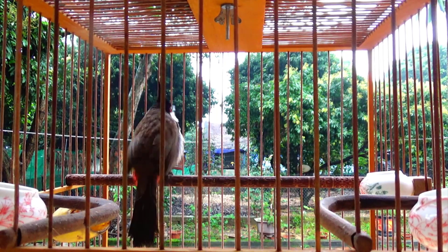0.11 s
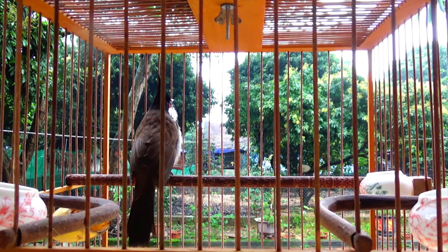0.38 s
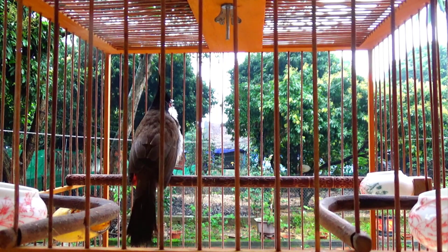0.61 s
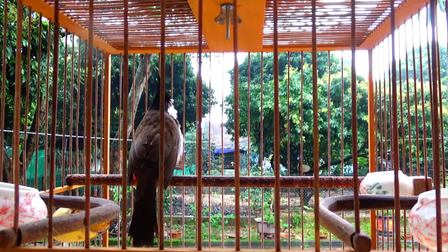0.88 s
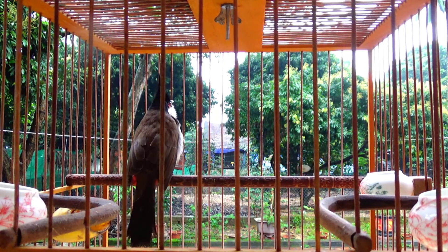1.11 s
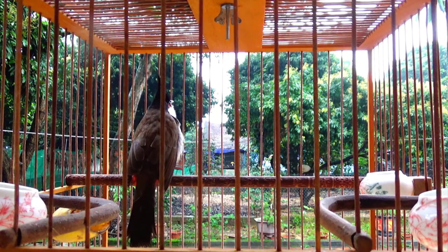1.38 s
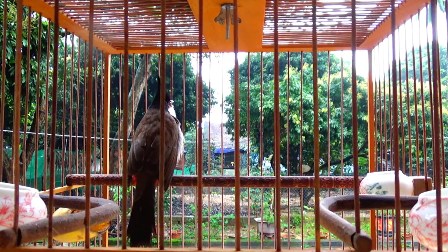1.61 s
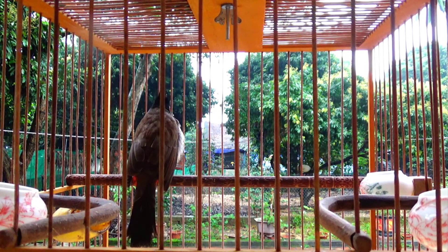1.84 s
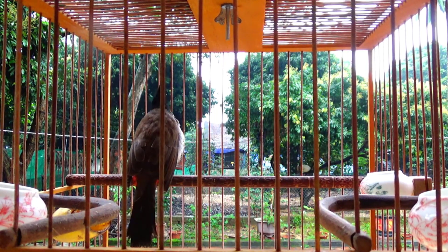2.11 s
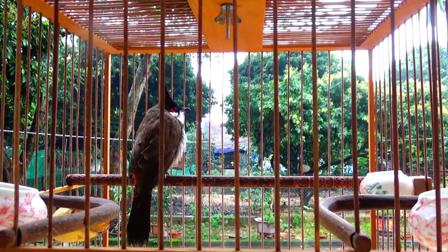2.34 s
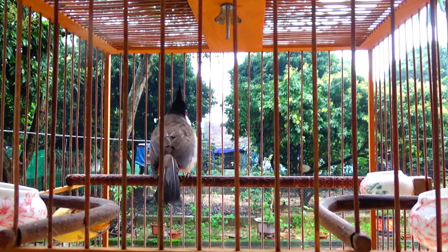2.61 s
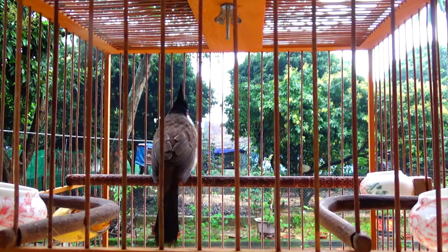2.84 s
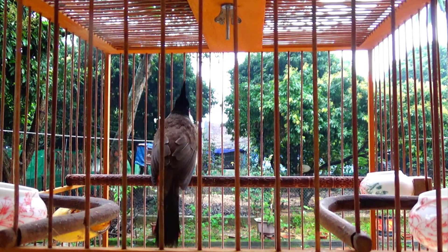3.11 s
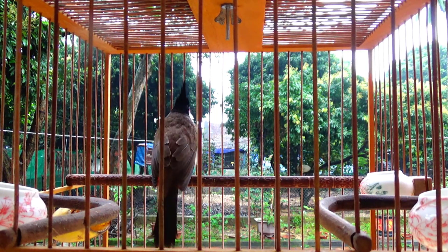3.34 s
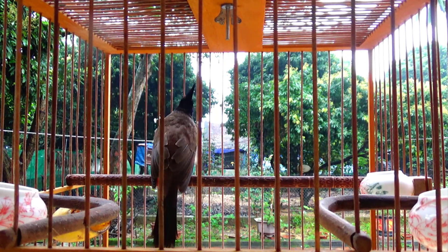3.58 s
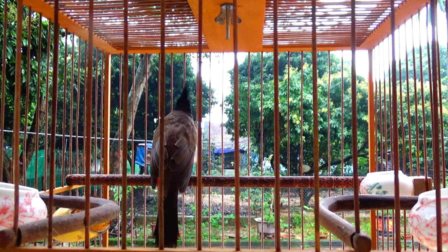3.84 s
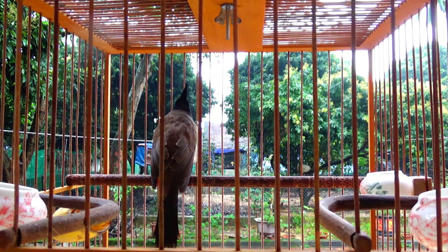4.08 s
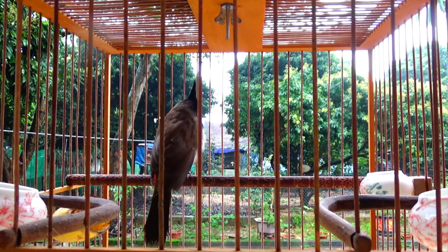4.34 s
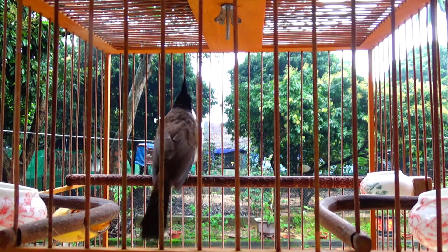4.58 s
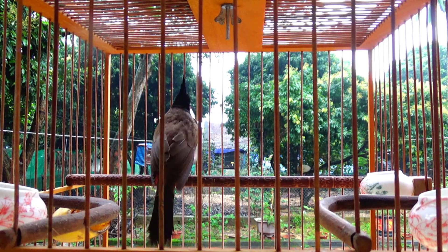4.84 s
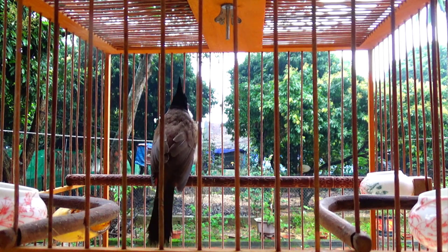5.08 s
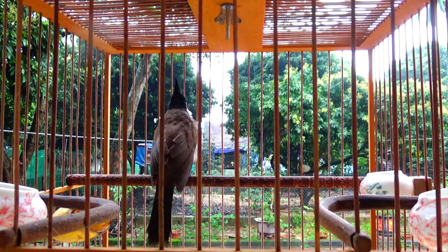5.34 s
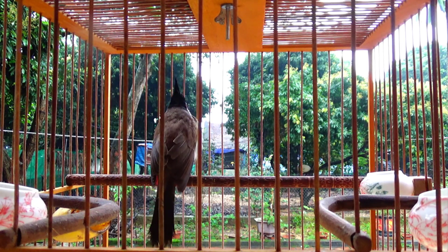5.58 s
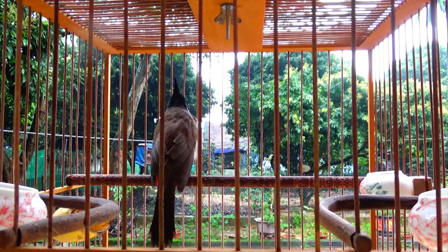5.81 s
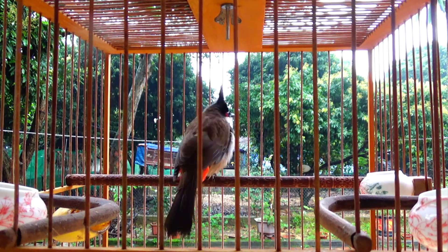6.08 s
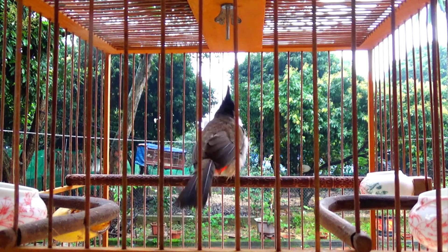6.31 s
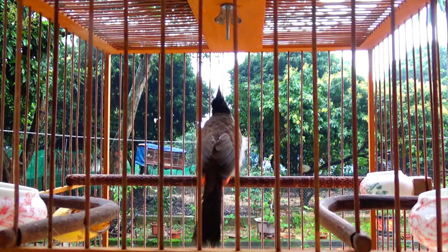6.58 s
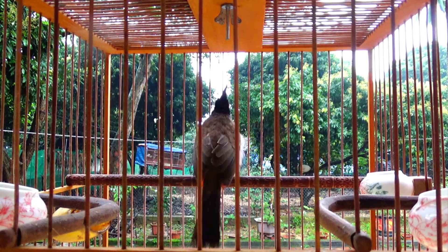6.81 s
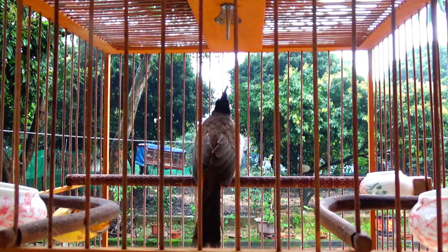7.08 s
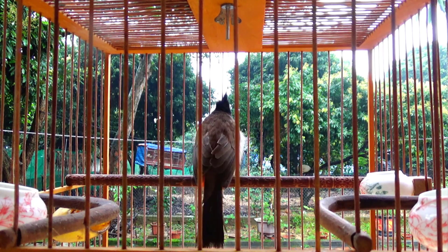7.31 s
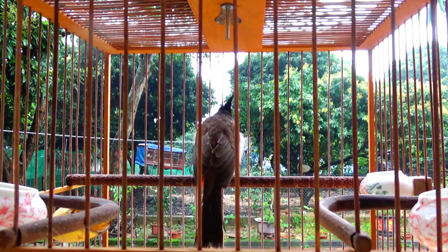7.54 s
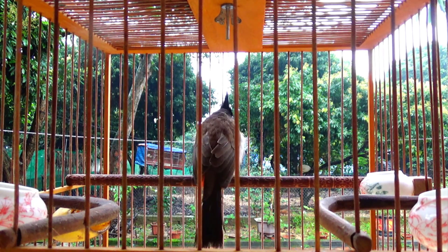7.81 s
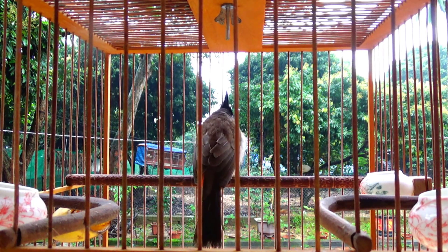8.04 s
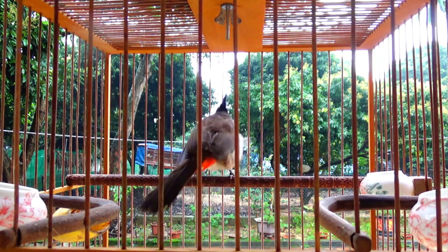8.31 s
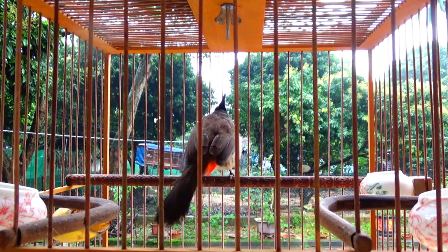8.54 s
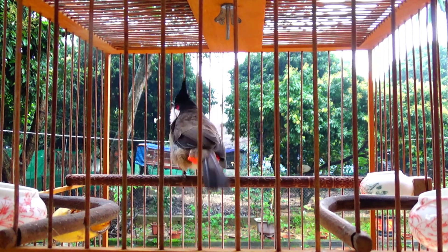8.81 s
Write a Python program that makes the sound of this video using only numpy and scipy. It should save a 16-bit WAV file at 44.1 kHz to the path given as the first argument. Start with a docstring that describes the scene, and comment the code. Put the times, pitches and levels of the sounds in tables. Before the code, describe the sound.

Outdoors among trees, a small caged songbird sings very close to the microphone. At 0 s the faint echo of earlier song dies away. At 0.2 s comes a quick climbing trill of tiny pulses, then four short, bright warbled whistles from 0.4 to 1.1 s: one leaping upward, one high, one mid-pitched and wavering, and a softer low one that curls up and falls. Nearly the same phrase returns at 2.65-3.6, 4.6-5.45 and 6.25-7.15 s. A lone trill sounds at 8.75 s. Scattered tree echoes trail each phrase. Between them lie soft low traffic rumble, faint drone swells, airy hiss with thin insect tones, and weak distant bird calls and whistles. Abrupt joins near 2.3, 4.3, 5.9 and 8.4 s cut echoes and shift the background, with leftover song tails after some. Loud notes briefly duck the background; the image is nearly mono.

```python
"""The echo tail of an earlier song rings first; then a songbird close to the microphone sings a pulsed trill
and four warbled whistles. The phrase returns three times, and a last trill stands alone; pitched sines with
throat overtones make it. Throughout, filtered noise gives tree echoes, distant birds, traffic rumble and insect
hiss. Four splices cut off the echoes and reset the background; a fast limiter holds the peaks and ducks the rest."""
import sys
import numpy as np
from scipy import signal
from scipy.fft import rfft, irfft
from scipy.io import wavfile
from scipy.ndimage import uniform_filter1d, minimum_filter1d

SR = 44100
rng = np.random.default_rng(int(sys.argv[2]) if len(sys.argv) > 2 else 0)


def store_pcm(level_fs):
    """Save levels as 16-bit WAV."""
    pcm = np.round(np.clip(level_fs, -1, 1) * 32767).astype(np.int16)
    wavfile.write(sys.argv[1], SR, np.atleast_2d(pcm).T)


def elevation(decibels):
    """Turn decibel levels (scalar or array-like) into linear amplitude ratios."""
    levels = np.asarray(decibels, float)
    return 10 ** (levels / 20)


N = 393372

# Four whistle shapes before transposing: from_start_s, pitch_hz, relative level_db
SYLLABLES = [
    [(.002, 1419, -26), (.006, 1615, -23), (.011, 2122, -7), (.014, 2110, -15), (.068, 1980, -7.5),
     (.071, 2399, -1), (.0815, 2317, -1), (.095, 2524, -10), (.1015, 2588, -26.5)],
    [(.001, 1358, -36.5), (.0065, 1712, -20.5), (.011, 1788, -14), (.021, 1833, -14.5), (.031, 2330, -4),
     (.0355, 3161, -6), (.0485, 3263, -8), (.064, 3218, -3.5), (.07, 3256, -19), (.085, 3206, -17.5),
     (.105, 3204, -27.5), (.122, 3253, -39.5)],
    [(0, 2490, -32), (.004, 2335, -10), (.01, 2194, -8), (.025, 2290, -14.5), (.029, 2536, -2),
     (.049, 2631, -9.5), (.054, 2457, -8.5), (.0935, 2377, -3), (.0965, 2440, -28), (.1015, 2352, -31)],
    [(0, 1377, -42), (.0065, 1463, -18), (.016, 1537, -20), (.018, 1746, -6.5), (.045, 1764, -8),
     (.05, 1506, -12.5), (.064, 1526, -15.5), (.0745, 1842, -2), (.088, 2005, -11), (.109, 1772, -11),
     (.128, 1623, -16.5), (.16, 1497, -19.5), (.1675, 1580, -42)],
]
# Where each shape turns from its first part to its second: from_start_s
TURN_S = [.072, .030, .054, .086]
# Sung whistles, the four shapes in turn: start_s, turn_s, end_s, pitch_factor, relative level_db
NOTES = [(0.409, 0.483, 0.5164, 1.064, 0), (0.606, 0.637, 0.7275, 1.018, -1),
         (0.737, 0.793, 0.8405, 1.015, -0.5), (0.964, 1.049, 1.1355, 1.02, -5),
         (2.897, 2.969, 2.9985, 1.06, -1.5), (3.086, 3.116, 3.2075, 1, 0.5),
         (3.212, 3.266, 3.3135, 1.011, -0.5), (3.414, 3.5, 3.5815, 1.017, -4.5),
         (4.748, 4.822, 4.8515, 1.037, -2), (4.939, 4.968, 5.0605, 1.01, 1.1),
         (5.067, 5.122, 5.1675, 1.009, -1.8), (5.281, 5.365, 5.4525, 1.016, -4),
         (6.467, 6.539, 6.5675, 1.027, -0.8), (6.658, 6.687, 6.7785, 1.004, 0.4),
         (6.785, 6.837, 6.8845, 1.016, 3), (6.985, 7.07, 7.1585, 1.016, -5)]
# Upward flicks of pitch per shape, before transposing: from_start_s, height_hz, half_width_s
FLICKS = [
    [(.0735, 366.3, 0.0016), (.0848, 600, 0.0031), (.0965, 361.7, 0.0025)],
    [(0.0275, 768, .0022)],
    [(.021, 250, .003), (.057, 576, 0.003), (.0668, 635, 0.0042)],
    [(.0185, 600, 0.0015), (.0695, 400, .002), (.0795, 253, 0.002), (.0885, 398.5, .0025), (.1, 747, .004)],
]
# Brief dips in the tone per shape, before scatter: from_start_s, depth_db (negative lifts)
BREAKS = [
    [(.07, 18), (.086, 10), (.0955, 7.5)],
    [(.0145, -1), (.023, 18.5), (.0275, 9.5), (.0315, 20.5)],
    [(.007, 16), (.012, 16), (.0265, 11.5), (.054, 14)],
    [(.0205, 5), (.049, 8.5), (.063, 4), (.069, 5), (.077, 8.5), (.084, 12.5), (.092, 14.5), (.0945, 13),
     (.105, 5)],
]
BREAK_S, BREAK_SCATTER_S, BREAK_SCATTER = 0.0013, 0.0006, 0.35  # half width, time spread, log depth spread
FADE_S = 0.002  # fade at both ends of a whistle, in shape time

# Trills: first_pulse_s, last_pulse_s, pulses, soft_pulses at the start, first_pitch_hz (before scatter)
TRILLS = [(.2192, .269, 7, 0, 2170), (2.647, 2.6838, 6, 3, 1900), (4.5817, 4.6397, 8, 2, 1975),
          (6.24, 6.2996, 8, 1, 2060), (8.726, 8.7823, 8, 2, 1750)]
LAST_GAP_S = 0.0103  # gaps between pulses change evenly to this
TRILL_TOP_HZ, TRILL_CLIMB_S, LAST_PULSE_SAG_HZ = 2620, 0.011, 90.5
TRILL_TOP_DB, SOFT_START_DB, SOFTEST_DB = -2.5, -7, -12
TRILL_SCATTER_S, TRILL_SCATTER_HZ, TRILL_SCATTER_DB = 0.0004, 63, 1.2
PULSE_RISE_S, PULSE_FALL_S = 0.001, 0.0018
PULSE_DROP_HZ, PULSE_DROP_S = 260, 0.002
SCOOP_HZ, SCOOP_S, SCOOP_DB = 1195, 0.011, -8  # lead-in; dB re first pulse

# Overtone strength through throat and beak: frequency_hz, level_db re fundamental
THROAT = [(2200, -15.5), (3550, -16.5), (4000, -25), (4700, -33), (6500, -22), (8000, -28.5),
          (10000, -31.5), (12500, -35), (15500, -40.5)]
# Voice per shape, trill last: overtones_db, low_note_ring_hz, ring_width_hz, ring_lift_db, buzz_db
VOICING = [(1, 14000, 1400, 9, -35.5), (-3, 11000, 1200, 15.5, -37.5), (-6.5, 12000, 1200, 5, -43),
           (-10.5, 12100, 1400, 20, -28), (-3.5, 7000, 1700, 1.5, -32)]
# Per shape, trill last: partial_1.5_db, partial_2_db (both re throat), octave_share of unevenness
LOW_PARTIALS = [(4.5, 13.5, 0.51), (4, 7.5, 0.55), (-9.5, -6, 0), (3.5, -0.5, 0.25), (-4, -3, 0)]
# Uneven cycles add half-pitch partials, per shape: from_s, to_s, level_db re overtones
HALVES = [(0.057, 0.067, -2.5), (0.015, 0.032, 3.5), (0.0035, 0.069, -3.5), (0.045, 0.21, 1.5)]
EVEN_DB = -20  # those partials elsewhere in a whistle
# The beak turns toward the microphone, per phrase: treble_db at FACING_HZ
FACING_DB = [1.5, 1.5, 2.3, 3.4, 0.23]
FACING_HZ, FACING_POWER = 10000, 3.3  # higher treble changes more
# Gape of the beak moves the lowest throat resonance, per phrase: frequency_factor
GAPE = [1.05, .97, .87, .97, 1.01]
HIGH_NOTE_RING_HZ = 9880  # throat resonance on high notes
# Overtones above TOP_HZ are stronger on low notes and weaker on high ones
TOP_HZ, TOP_SWING_DB, LOW_NOTE_HZ, LOW_NOTE_SPAN_HZ = 11500, 4, 2330, 115
GLIDE_DULL_HZ_PER_S, EFFORT_POWER = 45000, 0.35  # overtones halve at this glide rate
RASP_DB, RASP_WIDTH_HZ = -19, 500
SINGER_DB = 2

# Joins between stretches of time: at_s
SPLICES_S = [2.335, 4.27, 5.915, 8.37]
ECHO_DB, ECHO_T60_S, ECHO_CLUMP_DB = -17, 0.3, 3
LONG_ECHO_DB, LONG_ECHO_T60_S = -19, 0.65  # re quick part
BRIGHT_ECHO_DB, BRIGHT_ECHO_T60_S = 7.5, 0.18
ECHO_ONSET_S, ECHO_SIDE = 0.02, 0.2

# Echo tails of earlier song at the start and after splices, and blurred distant calls:
# start_s, length_s, start_hz, end_hz, width_hz, level_db
TAILS_AND_CALLS = [ (0., 0.0097, 3220, 3125, 200, -27.5), (0.01, .2, 2926, 2935, 258, -34),
                   (0.016, 0.27, 2422, 2330, 247, -30), (0.071, .12, 6420, 5290, 900, -49),
                   (0.105, 0.13, 5100, 4675, 250, -43), (1.272, 0.12, 3190, 3430, 600, -55.5),
                   (1.37, 0.14, 3764, 3890, 700, -52), (1.522, 0.14, 5684, 5670, 153, -53),
                   (1.537, .08, 4720, 4180, 1470, -49), (2.337, .07, 3070, 3183, 326, -33),
                   (2.394, 0.43, 2910, 2898, 310, -28), (2.336, 0.65, 2366, 2400, 224, -28),
                   (2.686, .07, 3540, 3012, 500, -30), (4.284, 0.3, 2215, 2225, 200, -39.5),
                   (4.29, 0.25, 1846, 1890, 100, -39), (4.401, 0.19, 2485, 3133, 750, -42),
                   (5.916, 0.17, 2180, 2130, 170, -36.5), (5.917, 0.058, 1750, 1660, 153, -45.5),
                   (6.123, 0.19, 6330, 6143, 300, -41.5), (6.151, .08, 2125, 3130, 500, -44.5),
                   (7.455, .12, 6350, 6250, 400, -44.5), (7.504, 0.52, 2820, 2820, 302, -51.5),
                   (7.724, 0.17, 2305, 2150, 220, -41.5), (7.929, 0.32, 2742, 2747, 430, -35.5),
                   (8.039, 0.078, 2300, 2300, 150, -45), (8.116, 0.073, 1690, 1985, 250, -44.5),
                   (8.198, 0.177, 1820, 1900, 350, -46), (8.264, 0.095, 2590, 2456, 150, -35.5),
                   (8.578, 0.084, 5950, 5900, 288, -46.5), (8.607, .1, 4414, 4034, 700, -47)]
# Distant held whistles: start_s, length_s, pitch_hz, level_db
FAR_WHISTLES = [(2.789, 0.066, 850, -51), (3.625, .06, 4710, -62), (3.72, 0.069, 4700, -74),
                (3.861, 0.096, 5240, -56), (4.015, 0.057, 5240, -64), (4.17, .11, 4570, -56),
                (6.39, 0.075, 1033, -49), (7.996, 0.29, 1030, -56.5), (8.377, 0.21, 1320, -57)]
WHISTLE_WIDTH_HZ = 30
FAR_T60_S, FAR_ATTACK_S, FAR_RELEASE_T60_S = 1, 0.01, 0.2

# Background of each stretch: rumble_db, rumble_sink_db, hiss_db, hiss_sink_db, hum_db
STRETCHES = [(-47, 10, -49.5, 4.5, -62), (-48, 8.5, -47, 8.5, -65), (-44.5, 13, -46, 6.5, -69.5),
             (-48, 5.5, -45, 6.5, -67), (-45.5, -3, -52, 1, -75)]
RUMBLE_SINK_S, HISS_SINK_S, SINK_POWER = 0.65, 0.37, 5
# Traffic spectrum: frequency_hz, relative density_db per Hz
RUMBLE = [(15, -48), (36, -12), (113, -3), (146, -0.5), (232, -2), (493, -10), (585, -13), (782, -12),
          (1500, -24.5), (1950, -38.5), (3300, -120)]
# One swell of the traffic: centre_s, height_db, half_width_s
RUMBLE_SWELL = (7.65, 4.5, .16)
HUM_HZ, HUM_WIDTH_HZ = 600, 81
# Swells of the low drone: centre_s, peak_db, half_width_s
DRONE_SWELLS = [(0.201, -41, 0.033), (.92, -53, 0.048), (4.4, -47.5, 0.12), (5.32, -59.5, 0.13),
                (7.63, -48, 0.1)]
DRONE_HZ, DRONE_WIDTH_HZ = 154, 31
# Hiss spectrum: frequency_hz, relative density_db per Hz
HISS = [(590, -16), (1000, -3.5), (1630, -1.5), (2410, 0), (4210, -4.5), (5070, -7.5), (6550, -2),
        (8650, -9.5), (14900, -16.5), (16000, -25)]
# Insect bands: centre_hz, width_hz, level_db re hiss
INSECTS = [(7880, 50, -15), (9200, 50, -18), (10100, 50, -18.5)]
TREBLE_HZ, TREBLE_SINK = 3300, 0.32  # hiss treble follows the level by this extra share
SIDE_DB = -18.5  # stereo side of rumble and hiss, re mid
LIMIT_DB, RELEASE_DB_PER_S = -2.8, 170


def syrinx(pitch_hz, effort, half_db, shape, facing_db=0, gape=1):
    """A near sine; overtones grow with effort, weaken in fast glides and ring in the throat, where air buzzes."""
    size = len(pitch_hz)
    bright_db, ring_hz, width_hz, lift_db, buzz_db = VOICING[shape]
    low_15_db, low_2_db, octave_share = LOW_PARTIALS[shape]
    half_turn = np.pi * np.cumsum(pitch_hz * (1 + 0.0065 * wobble(size, 130))) / SR
    lowness = np.tanh((LOW_NOTE_HZ - pitch_hz) / LOW_NOTE_SPAN_HZ)  # 1 on low notes, -1 on high ones
    ring_hz = HIGH_NOTE_RING_HZ + (ring_hz - HIGH_NOTE_RING_HZ) * (1 + lowness) / 2
    overtones = np.zeros(size)
    for k in range(3, 22):  # partials in steps of half the pitch
        hz = k * pitch_hz / 2
        if k < 5:
            db = at_hz(THROAT, np.where(hz < 5000, hz / gape, hz)) + (low_15_db if k == 3 else low_2_db)
        else:
            db = at_hz(THROAT, hz) + bright_db
            db += facing_db * (np.minimum(hz, 16000) / FACING_HZ) ** FACING_POWER
            db += lift_db * np.exp(-((hz - ring_hz) / width_hz) ** 2)
            db += TOP_SWING_DB * lowness / (1 + np.exp((TOP_HZ - hz) / 400))
        db = db + half_db * (octave_share if k == 4 else k % 2)
        partial = np.sin(k * half_turn + k * k)
        overtones += elevation(db + 3.9 * wobble(size, 120)) * (hz < 16000) * partial
    glide = uniform_filter1d(np.abs(np.gradient(pitch_hz)), size=80) * SR
    steady = 1 / (1 + glide / GLIDE_DULL_HZ_PER_S)
    buzz = elevation(buzz_db + facing_db) * narrow(ring_hz, 2 * width_hz)
    rasp = elevation(RASP_DB) * (1.05 - steady) * narrow(pitch_hz, RASP_WIDTH_HZ)  # roughens fast glides
    brightness = (effort / effort.max()) ** EFFORT_POWER
    return effort * (np.sin(2 * half_turn) + rasp + brightness * (steady * overtones + buzz))


def trills():
    """Short puffs of tone climb in pitch, often from a soft start; later puffs slide down. A soft scoop leads in."""
    out = np.zeros(N)
    t = np.arange(-200, 400) / SR
    puff = np.exp(-0.5 * (t / np.where(t < 0, PULSE_RISE_S, PULSE_FALL_S)) ** 2)
    slide = np.exp(np.minimum(-t / PULSE_DROP_S, 1.1)) - 0.7
    scoop = np.linspace(0, 1, int(SCOOP_S * SR))
    for facing_db, (first, last, pulses, soft, first_hz) in zip(FACING_DB, TRILLS):
        first_gap = 2 * (last - first) / (pulses - 1) - LAST_GAP_S
        times = first + np.cumsum(np.r_[0, np.linspace(first_gap, LAST_GAP_S, pulses - 1)])
        climb = (TRILL_TOP_HZ - first_hz) * np.exp(-(times - first) / TRILL_CLIMB_S)
        pitches = TRILL_TOP_HZ - climb + TRILL_SCATTER_HZ * rng.standard_normal(pulses)
        pitches[-1] -= LAST_PULSE_SAG_HZ
        soft_db = np.clip(SOFT_START_DB * (soft - np.arange(pulses)), SOFTEST_DB, 0)
        levels_db = TRILL_TOP_DB + soft_db + TRILL_SCATTER_DB * rng.standard_normal(pulses)
        times = times + TRILL_SCATTER_S * rng.standard_normal(pulses)
        settled = 1 - climb / climb[0]  # slide and treble set in as the climb levels off
        for s, hz, db, share in zip(times, pitches, levels_db, settled):
            pitch = hz + PULSE_DROP_HZ * share * slide
            pulse = syrinx(pitch, elevation(db) * puff, -30.0, shape=4, facing_db=facing_db + 8 * share - 8)
            out[round(s * SR) - 200:][:600] += pulse
        rise = SCOOP_HZ + (0.9 * pitches[0] - SCOOP_HZ) * scoop
        swell = elevation(SCOOP_DB + levels_db[0]) * scoop ** 2.5 * np.sin(np.pi * scoop) ** 0.5
        swell = swell * elevation(4.7 * wobble(len(scoop), 250))
        start = round(first * SR) - 110 - len(scoop)
        out[start:][:len(scoop)] += syrinx(rise, swell, -30.0, shape=4)
    return out


def warbles():
    """Each whistle bends through its shape with flicks and breaks, stretched in two parts and transposed."""
    out = np.zeros(N)
    for k, (start, turn, end, factor, db) in enumerate(NOTES):
        shape, phrase = k % 4, k // 4
        s, hz, level_db = np.transpose(SYLLABLES[shape])
        at = np.arange(int(start * SR), int(end * SR))
        u = np.interp(at / SR, [start, turn, end], [0, TURN_S[shape], s[-1]])  # shape time
        pitch = uniform_filter1d(np.interp(u, s, hz), size=40) + bumps(u, FLICKS[shape])
        level = np.sqrt(2) * uniform_filter1d(np.interp(u, s, elevation(level_db + db)), size=30)
        breaks = []
        for when, depth_db in BREAKS[shape]:
            when = when + BREAK_SCATTER_S * rng.standard_normal()
            depth_db = depth_db * np.exp(BREAK_SCATTER * rng.standard_normal())
            breaks.append((when, depth_db, BREAK_S))
        fade = np.clip(np.minimum(u, s[-1] - u) / FADE_S, 0, 1)
        level = level * elevation(-bumps(u, breaks)) * fade
        first, last, half_db = HALVES[shape]
        uneven_db = np.interp(u, [first - 0.004, first, last, last + 0.0069],
                              [EVEN_DB, half_db, half_db, EVEN_DB])
        flutter = elevation(1.1 * wobble(len(at), 150))
        out[at] += flutter * syrinx(pitch * factor, level, uneven_db, shape=shape,
                                    facing_db=FACING_DB[phrase], gape=GAPE[phrase])
    return out


def trees(x):
    """Scattered echoes build up, then decay in quick, bright and slow dull parts; each splice cuts them off."""
    t = np.arange(SR // 2) / SR
    clumps = elevation(ECHO_CLUMP_DB * wobble(len(t), 120))  # trunks return echoes in clumps
    white = rng.standard_normal((2, len(t))) * clumps
    dull = signal.sosfilt(signal.butter(2, 4000, fs=SR, output="sos"), white)
    body = elevation(-60 * t / ECHO_T60_S) + elevation(LONG_ECHO_DB - 60 * t / LONG_ECHO_T60_S)
    bright = elevation(BRIGHT_ECHO_DB - 60 * t / BRIGHT_ECHO_T60_S)
    tail = (dull * body + (white - dull) * bright) * np.clip(t / ECHO_ONSET_S, 0, 1)
    tail = tail / np.sqrt(np.sum((dull[0] * body) ** 2))
    pair = tail[0] + ECHO_SIDE * tail[1] * [[1], [-1]]
    edges = [0] + [int(s * SR) for s in SPLICES_S] + [N]
    stretches = []
    for a, b in zip(edges, edges[1:]):
        stretches.append(signal.fftconvolve(x[None, a:b], pair, axes=1)[:, :b - a])
    return np.hstack(stretches)


def tails_and_far_birds():
    """Gliding noise bands for echo tails and calls, and thin held whistles, die away, cut short by any splice."""
    out = np.zeros((2, N))
    blurred = [tuple(row) + (60 / FAR_T60_S,) for row in TAILS_AND_CALLS]
    held = [(s, length, hz, hz, WHISTLE_WIDTH_HZ, db, 0) for s, length, hz, db in FAR_WHISTLES]
    cuts = np.r_[SPLICES_S, N // SR + 1]
    for s, length, start_hz, end_hz, width_hz, db, fade_db_per_s in blurred + held:
        next_cut = cuts[np.searchsorted(cuts, s + FAR_ATTACK_S)]
        last = min(s + length + FAR_RELEASE_T60_S / 2, next_cut, (N - 1) / SR)
        t = np.arange(int((last - s) * SR)) / SR
        release_db = 60 * np.maximum(t - length, 0) / FAR_RELEASE_T60_S
        fade = elevation(db - fade_db_per_s * t - release_db) * np.clip(t / FAR_ATTACK_S, 0, 1)
        pitch = np.interp(t, [0, length], [start_hz, end_hz])
        side = 0.11 * narrow(pitch, width_hz) * [[1], [-1]]
        out[:, int(s * SR):][:, :len(t)] += fade * (narrow(pitch, width_hz) + side)
    return out


def traffic(rumble_db, hum_db):
    """Low noise shifts in level, with a faint narrow-band hum and a drone that swells now and then."""
    t = np.arange(N) / SR
    uneven_db = 2 * wobble(N, 3) + bumps(t, [RUMBLE_SWELL])
    rumble = elevation(rumble_db + uneven_db) * coloured(RUMBLE)
    hum = elevation(hum_db + 2.1 * wobble(N, 1.9)) * narrow(np.full(N, HUM_HZ), HUM_WIDTH_HZ)
    swells = bumps(t, [(s, elevation(db), width) for s, db, width in DRONE_SWELLS])
    drone = swells * narrow(np.full(N, DRONE_HZ), DRONE_WIDTH_HZ)
    return rumble + hum + drone


def insect_hiss(hiss_db):
    """Broad noise plus narrow insect bands; the noise grows duller as its level sinks."""
    insects = sum(elevation(db) * narrow(np.full(N, hz), width_hz) for hz, width_hz, db in INSECTS)
    hiss = coloured(HISS)
    highpass = signal.butter(2, TREBLE_HZ, "high", fs=SR, output="sos")
    treble = signal.sosfiltfilt(highpass, hiss)
    hiss = hiss + treble * (elevation(TREBLE_SINK * (hiss_db - hiss_db.mean())) - 1)
    return elevation(hiss_db + 3.6 * wobble(N, 0.73)) * (hiss + insects)


def background():
    """Traffic and insects share the level courses of the spliced stretches."""
    rumble_db, hiss_db, hum_db = stretch_levels()
    return traffic(rumble_db, hum_db) + insect_hiss(hiss_db)


def stretch_levels():
    """Each splice resets the levels in dB; rumble and hiss then move by their sink (negative rises) and settle."""
    t = np.arange(N) / SR
    stretch = np.searchsorted(SPLICES_S, t)
    since = t - np.r_[0, SPLICES_S][stretch]
    rumble_db, rumble_sink_db, hiss_db, hiss_sink_db, hum_db = np.array(STRETCHES)[stretch].T
    rumble_db = rumble_db - rumble_sink_db * (1 - np.exp(-(since / RUMBLE_SINK_S) ** SINK_POWER))
    hiss_db = hiss_db - hiss_sink_db * (1 - np.exp(-(since / HISS_SINK_S) ** SINK_POWER))
    return rumble_db, hiss_db, hum_db


def coloured(spectrum):
    """Mid and weaker side noise with a given spectrum, as left and right."""
    gain = elevation(at_hz(spectrum, np.arange(N // 2 + 1) * SR / N))
    mid, side = irfft(rfft(rng.standard_normal((2, N))) * gain, N)
    return rms_one(mid) + elevation(SIDE_DB) * rms_one(side) * [[1], [-1]]


def narrow(pitch_hz, width_hz):
    """A noise band around a moving centre."""
    turn = 2 * np.pi * np.cumsum(pitch_hz) / SR
    in_phase = wobble(len(turn), width_hz / 2) * np.cos(turn)
    return in_phase + wobble(len(turn), width_hz / 2) * np.sin(turn)


def wobble(size, hz):
    """Smooth random drift, mostly slower than hz, at rms 1."""
    r = np.exp(-2 * np.pi * hz / SR)
    noise = rng.standard_normal(size + 4000)
    return rms_one(signal.lfilter([1], [1, -2 * r, r * r], noise)[4000:])  # skips the filter's start


def bumps(u, rows):
    """Sum of bell-shaped bumps (centre, height, half width) along u."""
    return sum(height * np.exp(-((u - s) / width) ** 2) for s, height, width in rows)


def at_hz(points, hz):
    """A spectrum read on a log-frequency axis."""
    point_hz, db = np.transpose(points)
    return np.interp(np.log(hz + 1), np.log(point_hz), db)


def rms_one(x):
    """Scaled to rms 1."""
    return x / np.sqrt(np.mean(x ** 2) + 1e-20)


def scene():
    """The singer, its echoes and everything behind it."""
    singer = elevation(SINGER_DB) * (trills() + warbles())
    return singer + elevation(ECHO_DB) * trees(singer) + tails_and_far_birds() + background()


def low_pass(x):
    """Removes everything above the highest recorded frequency."""
    return signal.sosfilt(signal.butter(12, 16290, fs=SR, output="sos"), x)


def record(dry):
    """A limiter looks about a millisecond ahead: gain is down before a peak and recovers steadily."""
    peak_db = 20 * np.log10(np.abs(dry).max(axis=0) + 1e-9)
    over_db = np.maximum(peak_db - LIMIT_DB, 0)
    ramp_db = RELEASE_DB_PER_S * np.arange(N) / SR
    held_db = np.maximum.accumulate(over_db + ramp_db) - ramp_db
    ahead_db = -minimum_filter1d(-held_db, size=61)  # running maximum
    limited = dry * elevation(-uniform_filter1d(ahead_db, size=61))
    return low_pass(limited)


dry = scene()
out = record(dry)
store_pcm(out)
```